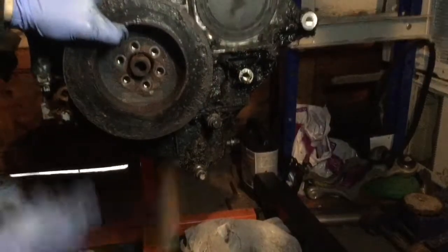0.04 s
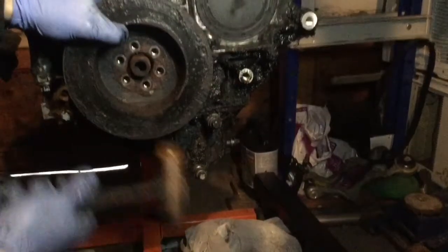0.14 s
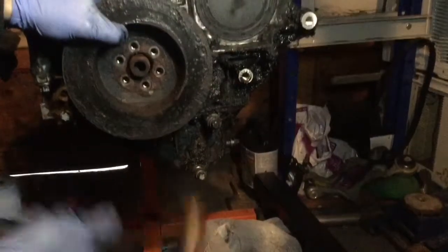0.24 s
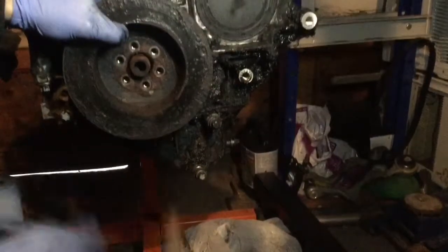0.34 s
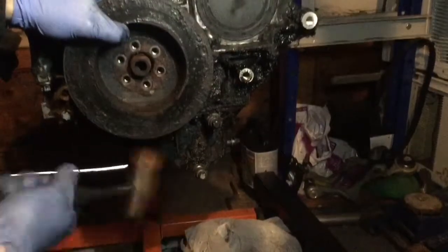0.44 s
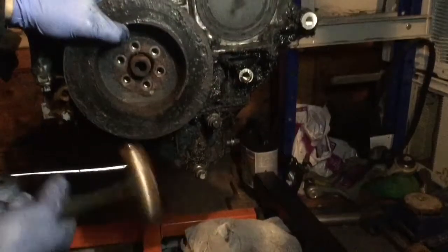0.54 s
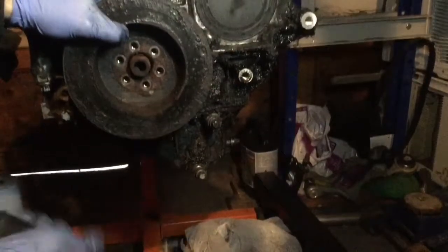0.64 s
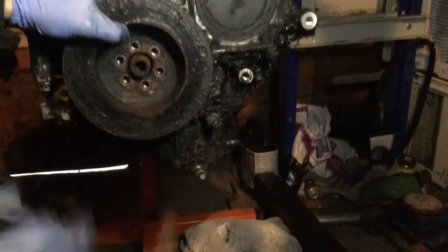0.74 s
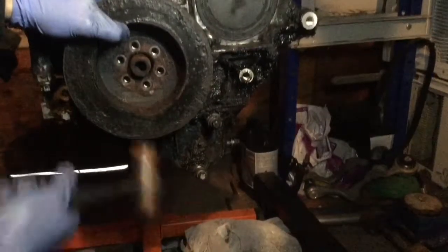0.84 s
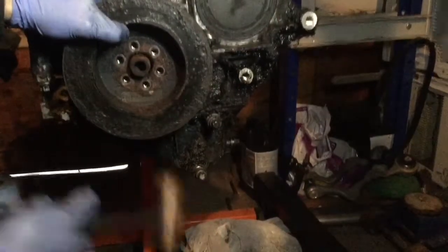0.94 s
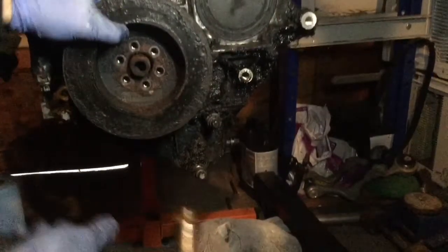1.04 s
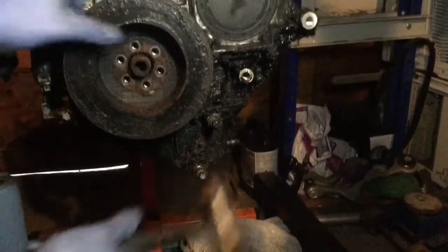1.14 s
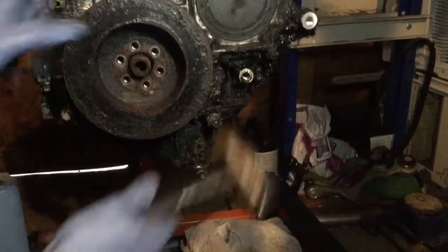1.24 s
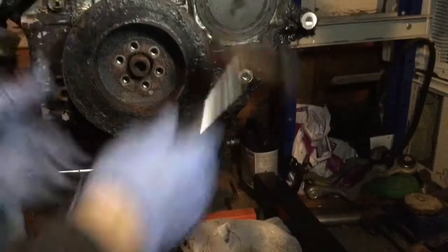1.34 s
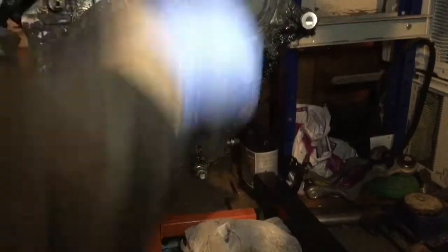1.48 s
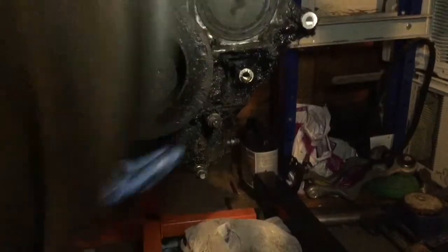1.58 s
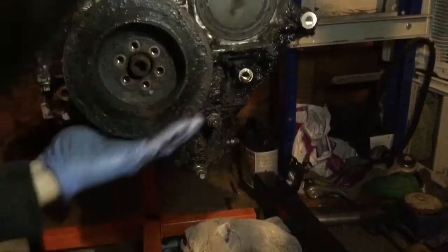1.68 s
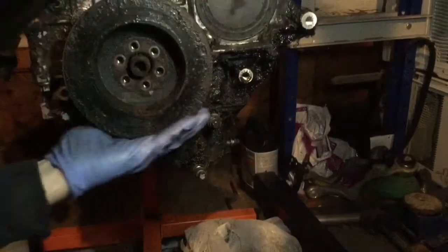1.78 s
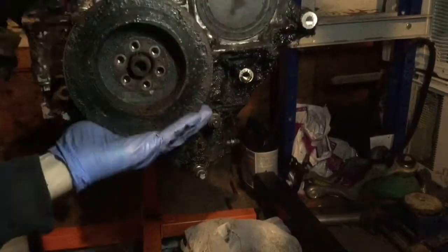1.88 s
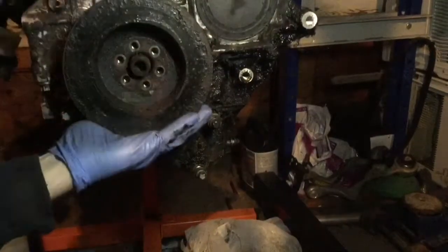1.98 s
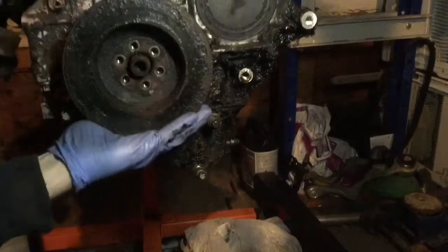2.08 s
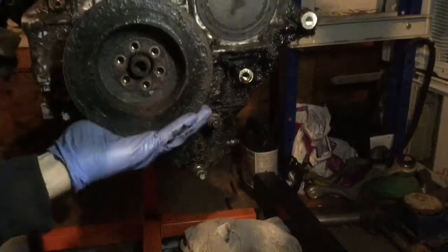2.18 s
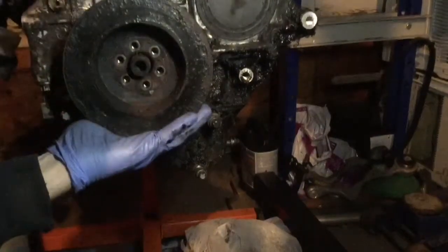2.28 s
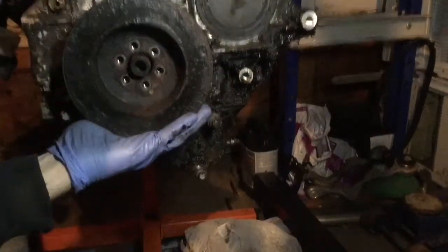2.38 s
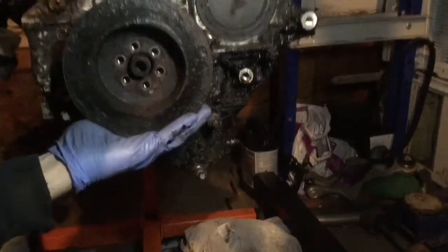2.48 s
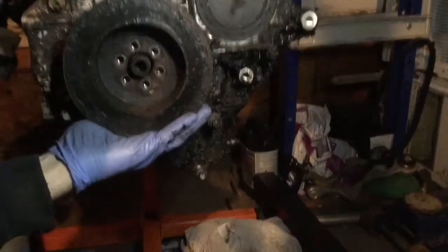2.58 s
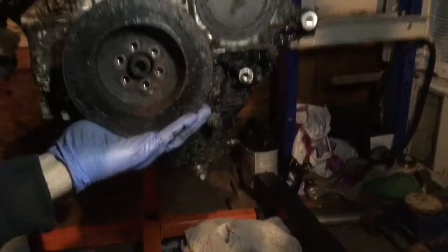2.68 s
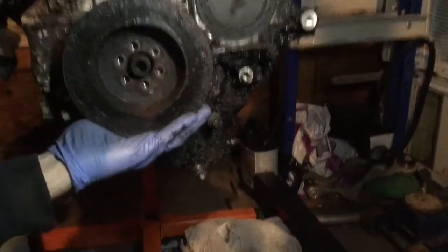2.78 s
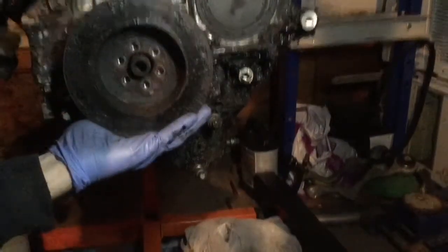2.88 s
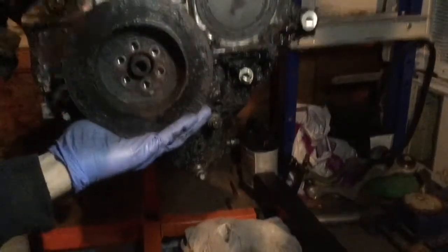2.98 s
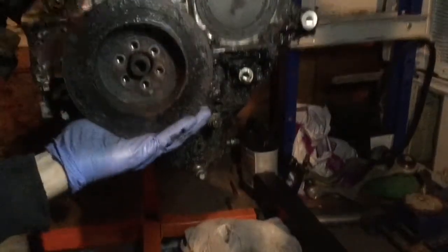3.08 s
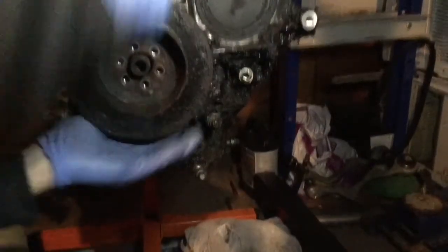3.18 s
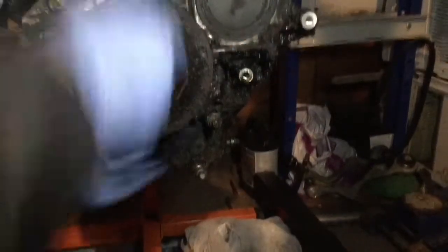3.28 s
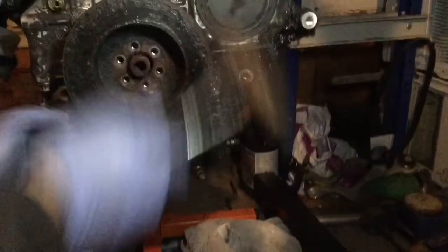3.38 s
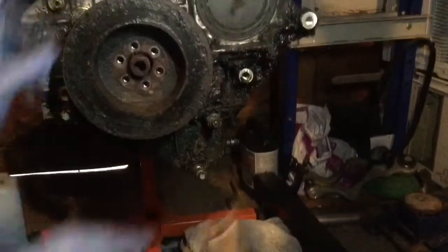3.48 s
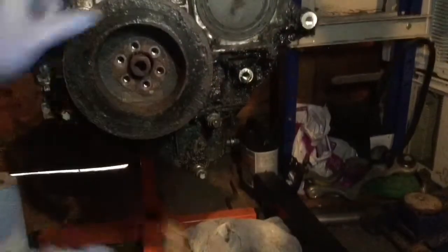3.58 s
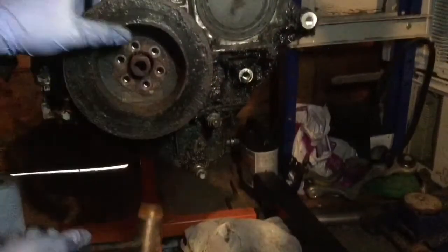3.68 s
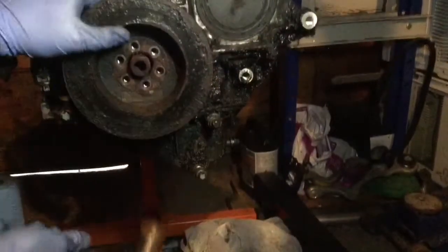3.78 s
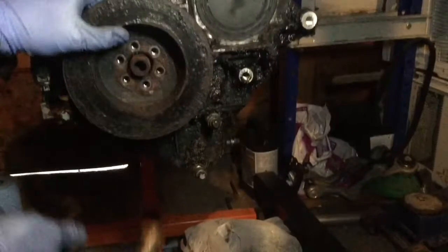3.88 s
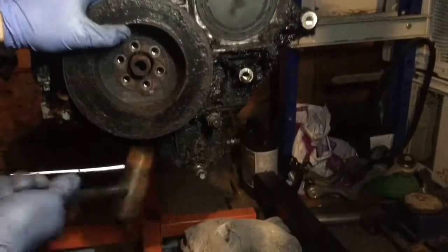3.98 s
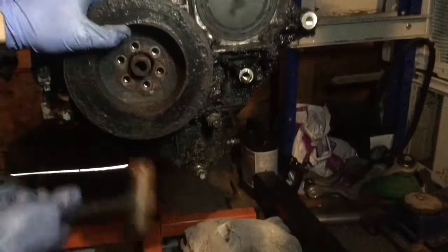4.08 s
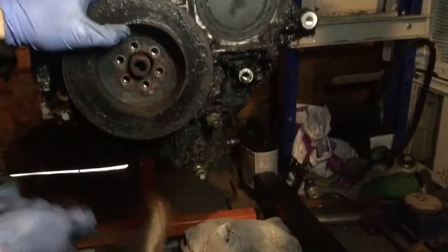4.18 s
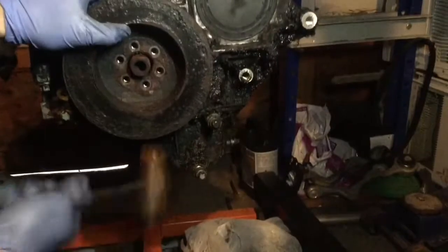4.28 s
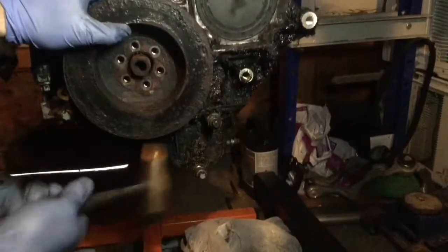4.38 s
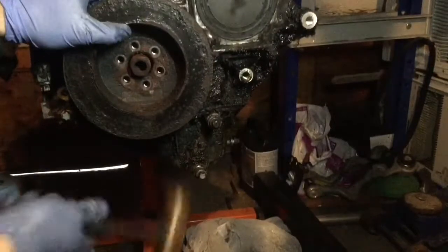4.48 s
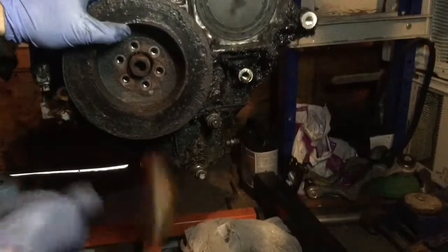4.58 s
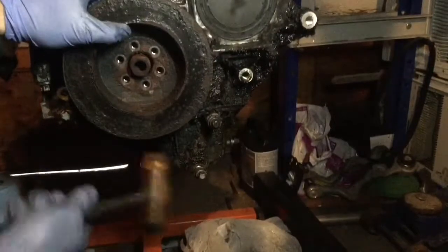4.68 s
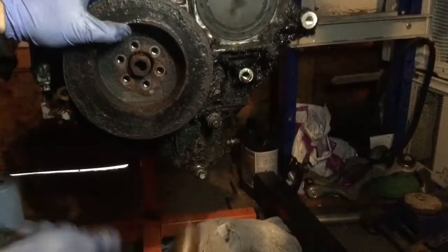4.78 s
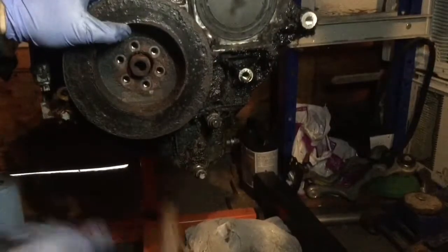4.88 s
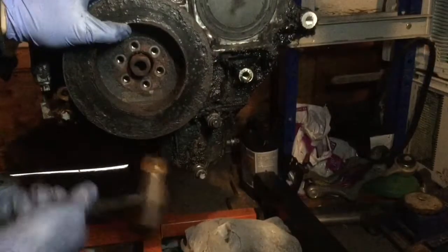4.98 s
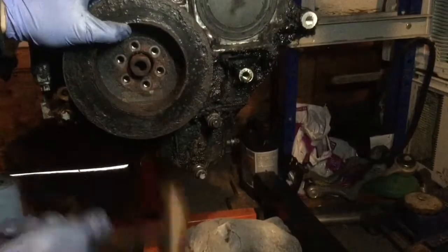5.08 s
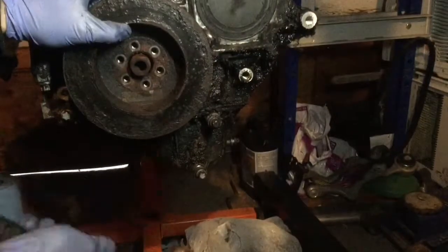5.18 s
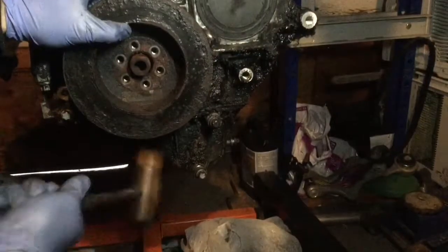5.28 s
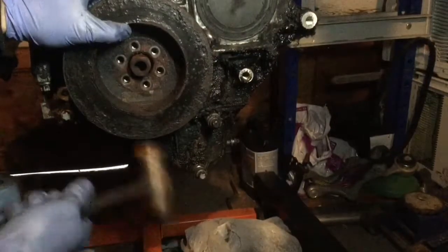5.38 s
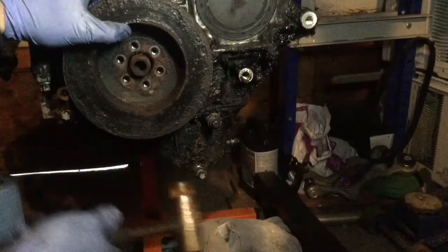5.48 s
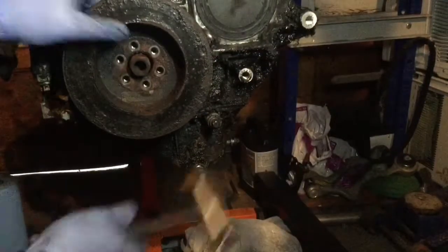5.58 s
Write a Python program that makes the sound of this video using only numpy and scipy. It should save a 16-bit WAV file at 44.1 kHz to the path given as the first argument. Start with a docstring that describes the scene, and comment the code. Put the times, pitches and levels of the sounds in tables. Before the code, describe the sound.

A mallet knocks a heavy steel engine pulley in three quick volleys, dull thuds with a short bright ring, cloth rustling between them.

```python
"""In a small workshop with a low rumble and a faint hum, a mallet strikes an engine's heavy steel pulley.
Three quick volleys follow one another. A gloved hand steadies and damps the pulley, so each blow is a thud,
a knock and a short bright ring: a noise crack, damped sines and decaying room noise.
Between the volleys the arm changes its grip: grainy cloth noise brushes past, the glove slides over
the steel, and small bumps wake the pulley's modes. One last short slide of the glove comes near the end."""
import sys
import numpy as np
from scipy import signal
from scipy.io import wavfile
from scipy.ndimage import uniform_filter1d

SR = 44100
rng = np.random.default_rng(int(sys.argv[2]) if len(sys.argv) > 2 else 0)


def master_out(mix):
    """Clip the mix to full scale and print it as 16-bit PCM to the path in sys.argv[1]."""
    frames = np.transpose(np.atleast_2d(mix))
    ceiling = np.clip(frames, -1, 1)
    pcm = np.round(ceiling * 32767).astype(np.int16)
    wavfile.write(sys.argv[1], SR, pcm)


N = 248724
TIME = np.arange(N) / SR
AGE = TIME[:int(0.75 * SR)]  # time since a blow (s)

# fine swish of sliding cloth and glove: pitch_hz, relative level (dB per Hz)
SWISH_SPECTRUM = [(1500, -21), (4000, -6.5), (6000, -8), (7500, -11), (12300, -3.5), (15000, -18),
                  (16000, -5)]


def from_db(db):
    """Decibels to gain."""
    return 10 ** (np.asarray(db) / 20)


def rms_one(x):
    """Scale to unit power."""
    return x / np.sqrt(np.mean(x ** 2) + 1e-20)


def at_hz(points, hz):
    """Read (pitch_hz, value) points on a log-frequency axis."""
    freqs, values = np.transpose(points)
    return np.interp(np.log(hz), np.log(freqs), values)


def add(track, start_s, sound):
    """Mix a sound into the track at a time."""
    start = round(start_s * SR)
    track[start:start + len(sound)] += sound[:N - start]


def noise_bands(size):
    """Narrow bands of noise, about a third of an octave wide, equal in power per Hz: (centre Hz, samples)."""
    edges_hz = np.geomspace(22, 17500, 30)
    run_in = SR // 5  # lets the filters settle
    white = rng.standard_normal((2, size + run_in))
    for k, (low, high) in enumerate(zip(edges_hz, edges_hz[1:])):
        bandpass = signal.butter(2, [low, high], "band", fs=SR, output="sos")
        # neighbouring bands draw on independent noises
        yield np.sqrt(low * high), signal.sosfilt(bandpass, white[k % 2])[run_in:]


def coloured(spectrum):
    """Steady noise with a given spectrum, rms 1."""
    return rms_one(sum(from_db(at_hz(spectrum, hz)) * band for hz, band in noise_bands(N)))


def dying(t60):
    """Exponential decay after a blow, 60 dB in t60 seconds."""
    return from_db(-60 * AGE / t60)


def swelling(rise_s):
    """Smooth build-up at the start of a sound."""
    return 1 - np.exp(-(AGE / rise_s) ** 2)


def ringing(modes, force, rise_s, scatter_db):
    """Damped sines, neighbours in opposite phase; low modes build up slower, and no two blows are quite alike."""
    out = np.zeros(len(AGE))
    for k, (hz, db, t60) in enumerate(modes):
        gain = from_db(db + at_hz(force, hz) + scatter_db * rng.standard_normal())
        sine = np.sin(2 * np.pi * hz * AGE + np.pi * k)
        out += gain * swelling(rise_s + 0.5 / hz) * dying(t60) * sine
    return out


def beating(cluster):
    """Nearly equal modes ring together and beat."""
    return sum(from_db(db) * dying(t60) * np.sin(2 * np.pi * hz * AGE) for hz, db, t60 in cluster)


def catching(depth_db, size):
    """A gain that wavers as a sliding surface catches and slips; size is the smoothing in samples."""
    waver = rms_one(uniform_filter1d(rng.standard_normal(N), size=size))
    return from_db(depth_db * waver)


def struck_at(spot):
    """The spot that is hit decides which modes answer: rows (pitch_hz, level_db, t60_s)."""
    # heavily damped modes of mallet, pulley and shaft: pitch_hz, t60_s,
    # then relative level_db when struck at the lower rim, the upper rim, the face
    damped_modes = [(213, 0.026, 6, 7, 7), (400, 0.022, 9, 12.5, 10.5), (551, 0.027, 9.5, 13, 8.5),
                    (787, 0.023, -10, 3.5, 6), (895.4, 0.017, 1, 11.5, 3), (1007, 0.023, 0.5, 2, 8),
                    (1213, 0.023, 8, 12.5, 13.5), (1398, 0.016, -0.5, 12, 9), (1580, 0.045, -6, -5, 2.5),
                    (1903, 0.025, -1, 2.5, 0), (2203, 0.1, -10.5, -2.5, -5.5), (2983, 0.026, 0.5, 0, -2.5),
                    (4727, 0.025, 6.5, 8, 3.5), (5023, 0.014, 6, 9.5, 5.5), (5420, 0.011, 7.5, 11, 15.5),
                    (5850, 0.01, 11.5, -3, 9), (6200, 0.01, 3, -1.5, 6)]
    return [(hz, levels_db[spot], t60) for hz, t60, *levels_db in damped_modes]


def background():
    """Workshop rumble as low coloured noise, with a faint electric hum of steady sines."""
    # workshop air: pitch_hz, relative level (dB per Hz)
    air_spectrum = [(20, -28), (35, -11), (55, 2), (100, -3), (160, -11), (300, -15), (500, -19),
                    (800, -21.5), (1800, -24), (2600, -28), (4000, -35), (7000, -40), (13000, -36),
                    (16000, -45)]
    # steady hum lines: pitch_hz, level_db (rms)
    hum_lines = [(100, -75), (449, -78), (1635, -87)]
    air_db = -61
    hum = np.zeros(N)
    for hz, db in hum_lines:
        hum += from_db(db) * np.sqrt(2) * np.sin(2 * np.pi * (hz * TIME + rng.random()))
    return from_db(air_db) * coloured(air_spectrum) + hum


def glove():
    """The glove slips over the steel with a thin, slightly uneven swish."""
    # slides: start_s, length_s, level_db
    slides = [(1.118, 0.09, -65), (1.708, 0.2, -63.5), (5.585, 0.066, -63.5)]
    edge_s = 0.014  # a slide starts and stops within this time
    level = np.zeros(N)
    for start_s, length_s, db in slides:
        nearest_end_s = np.minimum(TIME - start_s, start_s + length_s - TIME)
        level += from_db(db) * np.clip(nearest_end_s / edge_s, 0, 1)
    return level * coloured(SWISH_SPECTRUM) * catching(depth_db=2.0, size=1200)


def sleeve():
    """Cloth slides as the arm speeds up and slows: scuff, rub and swish, grainy from the catching weave."""
    # low scuff of cloth: pitch_hz, relative level (dB per Hz)
    scuff_spectrum = [(100, -9), (250, -1.5), (420, -3.5), (800, -9), (1200, -2), (2500, -37)]
    # dull rub of cloth: pitch_hz, relative level (dB per Hz)
    rub_spectrum = [(400, -18), (900, -2), (1350, -8), (2100, 1.5), (3000, -8.5), (4500, -12), (7000, -29),
                    (12000, -45)]
    # strokes of the sleeve: start_s, length_s, level_db of the rub at full speed, swish_db against the rub
    strokes = [(1.217, 0.31, -56.5, 0), (1.441, 0.21, -64, 1.5), (1.537, 0.3, -65.5, -7),
               (3.205, 0.29, -62, -7), (3.358, 0.19, -61.5, 1.5), (3.47, 0.4, -61, -2.5),
               (3.677, 0.25, -65, 1.6)]
    scuff_db = -3  # against the rub
    scuff_power, rub_power, swish_power = 1, 2.14, 2.14  # loudness as powers of the arm's speed
    out = np.zeros(N)
    grain = catching(depth_db=1.3, size=300)
    scuff, rub, swish = [coloured(spectrum) for spectrum in (scuff_spectrum, rub_spectrum, SWISH_SPECTRUM)]
    for start_s, length_s, db, swish_db in strokes:
        speed = np.sin(np.pi * np.clip((TIME - start_s) / length_s, 0, 1))
        out += from_db(db + scuff_db) * speed ** scuff_power * scuff
        out += from_db(db) * speed ** rub_power * rub
        out += from_db(db + swish_db) * speed ** swish_power * swish
    return out * grain


def hand():
    """Bumps and nudges wake the pulley's modes: a soft glove mostly the low ones, a harder nudge ticks."""
    # bumps: start_s, level_db of the push at 400 Hz, treble slope (dB per octave)
    bumps = [(1.398, -76, -4), (1.591, -55, -12), (2.141, -79.5, 3), (2.925, -75.5, 3), (3.243, -63, -3),
             (3.287, -51, -11.5), (3.396, -45, -6), (3.502, -67, -6)]
    out = np.zeros(N)
    modes = struck_at(0)  # as at the lower rim
    for start_s, db, slope in bumps:
        force = [(hz, db + slope * np.log2(hz / 400)) for hz, _, _ in modes]
        add(out, start_s, ringing(modes, force, rise_s=0.0019, scatter_db=1.5))
    return out


def workshop(bands, force, spot):
    """Dense reflections: the middle range returns alike for every blow on a spot, the rest differs."""
    # workshop reverberation: pitch_hz, relative level (dB per Hz)
    room_spectrum = [(30, -32), (80, -18), (140, -8.5), (300, -0.5), (550, 0.5), (800, -4), (1300, 0.5),
                     (2000, -4), (2700, -2.5), (3600, -10.5), (5200, -8), (7500, -17), (12500, -13),
                     (16000, -39)]
    # workshop decay: pitch_hz, t60_s
    room_decay = [(100, 0.41), (260, 0.26), (700, 0.22), (1840, 0.2), (4850, 0.15), (12800, .2)]
    same, fresh = spot * len(AGE), rng.integers(N - len(AGE))
    out = np.zeros(len(AGE))
    for hz, band in bands:
        start = same if 600 < hz < 2000 else fresh
        gain = from_db(at_hz(force, hz) + at_hz(room_spectrum, hz))
        out += gain * dying(at_hz(room_decay, hz)) * band[start:start + len(AGE)]
    return out * swelling(0.0024)


def contact(bands, force):
    """A burst of bright noise as the mallet face meets the steel."""
    # contact noise: pitch_hz, relative level (dB per Hz)
    crack_spectrum = [(1500, 4), (2500, 1), (3800, -3), (5200, 7), (7500, -3), (9500, 4), (12500, 6.5),
                      (16000, -6.5)]
    lowest_hz = crack_spectrum[0][0]
    start = rng.integers(N - len(AGE))
    hiss = np.zeros(len(AGE))
    for hz, band in bands:
        if hz > lowest_hz:
            gain = from_db(at_hz(force, hz) + at_hz(crack_spectrum, hz))
            hiss += gain * band[start:start + len(AGE)]
    return hiss * swelling(0.00096) * dying(0.0094)


def reflected(tone, echo_db, t60):
    """Dense wall echoes join a tone and make its decay lumpy."""
    echoes = rng.standard_normal(len(AGE)) * dying(t60) * swelling(0.026)
    echoes /= np.linalg.norm(echoes)
    return tone + from_db(echo_db) * signal.fftconvolve(tone, echoes)[:len(AGE)]


def rim(hold_s, drop_db, drop_s):
    """Close rim modes beat and decay; after hold_s a gain step lowers the ring by drop_db within drop_s."""
    # close modes of the pulley rim: pitch_hz, relative level_db, t60_s
    rim_modes = [(2629, 10, 0.21), (2642, 1.5, 0.08), (2612, 0, 0.27)]
    ring = reflected(beating(rim_modes) * swelling(0.0044), echo_db=-11, t60=0.26)
    gain_step = from_db(drop_db * np.clip((AGE - hold_s) / drop_s, 0, 1))
    return ring * gain_step


def shimmer():
    """The top overtones of the rim lie so close that they blur into a brief band of noise."""
    # a crowd of thin rim overtones: low_hz, high_hz, t60_s
    low, high, t60 = (8600, 9300, .15)
    bandpass = signal.butter(2, [low, high], "band", fs=SR, output="sos")
    band = rms_one(signal.sosfilt(bandpass, rng.standard_normal(len(AGE))))
    return band * swelling(0.00087) * dying(t60)


def blow_force(colour_db, strength_db, hardness_db, clink_db):
    """The spot's colour, raised by strength, tilted by hardness, with more or less clink: rows (Hz, dB)."""
    # where weight, thud, knock, clink and crack lie: pitch_hz
    blow_hz = [180, 500, 1100, 5200, 11000]
    knee_hz = 549  # hardness tilts everything above this pitch
    clink_hz, clink_octaves = 5200, 0.61  # middle and width of the clink
    hz = np.array(blow_hz)
    tilt = hardness_db * np.maximum(0, np.log2(hz / knee_hz))
    clink = clink_db * np.exp(-(np.log2(hz / clink_hz) / clink_octaves) ** 2)
    return list(zip(hz, np.array(colour_db) + strength_db + tilt + clink))


def mallet():
    """Each blow: a crack at the contact, damped modes, the ring of rim and block, and the room."""
    # blows, the fourth a rebound: start_s, spot (0 lower rim, 1 upper rim, 2 face), strength_db,
    # hardness (dB per octave), extra clink_db, rim ring_db, engine boom_db
    blows = [(0.1269, 0, -20.5, -1.2, 0.5, -37.5, -34.5), (0.4883, 0, -18.5, 2, -5, -26, -35),
             (0.86, 2, -19.5, -0.67, 5.5, -34.5, -37.5), (0.9207, 2, -31.5, -3, -7, -47, -41.5),
             (1.946, 1, -22, -0.3, -1, -34.5, -45), (2.2359, 1, -21, 0.94, -6, -29.5, -46),
             (2.504, 1, -21.5, 0, -1.5, -32.5, -46), (2.7692, 1, -22, -1, -0.5, -43.5, -60),
             (3.0392, 2, -18.5, -0.2, -7.5, -37, -46.5), (4.0319, 0, -22.5, 1.5, 0, -30, -46),
             (4.3582, 0, -22, -.4, 2.5, -39.5, -56.5), (4.6677, 0, -21.5, -1.2, 1, -48.5, -50),
             (4.9944, 0, -20.5, .3, 0.5, -44, -54.5), (5.3229, 0, -18, -0.66, 3, -44.5, -35.5)]
    # colour of a blow on the lower rim, the upper rim, the face:
    # tinkle_db, then relative weight_db, thud_db, knock_db, clink_db, crack_db
    spots = [(-27.5, -2, 0, -4.5, -12.5, -18.5), (-33, -3, 0, -0.34, -8, -10.5),
             (-34.5, -2, 0.002, -0.5, -9, -11)]
    # longer modes of the engine block and its stand: pitch_hz, relative level_db, t60_s
    block_modes = [(150, -21.5, 0.037), (191, -19.5, 0.15), (198.4, -11.5, 0.31), (266.5, -9, 0.22),
                   (300.4, -12.5, 0.23), (371, -5.5, 0.18), (459, -10, 0.23), (456, -11, 0.053),
                   (578, -13, 0.22), (616.2, -30, 0.22), (770, -20.5, 0.18), (993, -12.5, 0.23),
                   (1060, -18.5, 0.19), (1270, -31, 0.26), (1320, -16.5, 0.19), (1360, -40, .22),
                   (1510, -27.5, 0.23), (1760, -40, .25), (1660, -21, 0.12), (1912, -28, 0.22),
                   (2270, -17.5, 0.22)]
    # lightly damped steel parts that ring on faintly: pitch_hz, relative level_db, t60_s
    after_ring = [(642, -45, .8), (843, -45, .65), (945, -35, .4), (1275, -37, .45), (1595, -45, .7),
                  (1722, -46, .7), (1841, -44, .7), (2272, -42, .65)]
    # close modes of the whole engine that beat: pitch_hz, relative level_db, t60_s
    boom_modes = [(207.1, 7.1, 0.45), (200.66, 2.4, .48)]
    out = np.zeros(N)
    bands = list(noise_bands(N))
    for start_s, spot, strength_db, hardness_db, clink_db, rim_db, boom_db in blows:
        tinkle_db, *colour_db = spots[spot]
        force = blow_force(colour_db, strength_db, hardness_db, clink_db)
        crack = from_db(18.0) * contact(bands, force)
        knock = from_db(3.5) * ringing(struck_at(spot), force, rise_s=0.0013, scatter_db=1.94)
        block = from_db(2.5) * ringing(block_modes, force, rise_s=0.015, scatter_db=0.8)
        trail = ringing(after_ring, force, rise_s=0.012, scatter_db=4.5)
        rim_ring = from_db(rim_db) * rim(hold_s=0.076, drop_db=-8.5, drop_s=0.0093)
        tinkle = from_db(strength_db + tinkle_db) * shimmer()
        boom = from_db(boom_db) * beating(boom_modes) * swelling(0.04)
        room = from_db(10.0) * workshop(bands, force, spot)
        add(out, start_s, crack + knock + block + trail + rim_ring + tinkle + boom + room)
    return out


def scene():
    """Everything at one close microphone."""
    return (mallet() + sleeve() + glove() + hand() + background())[None]


def record(dry):
    """The hardest peaks are rounded by a soft limit and the top treble is cut steeply."""
    ceiling, cutoff_hz = 1.4, 16300
    rounded = ceiling * np.tanh(dry / ceiling)
    # the stopband, 70 dB down, begins a little above the cutoff
    lowpass = signal.cheby2(14, 70, cutoff_hz + 600, fs=SR, output="sos")
    return signal.sosfilt(lowpass, rounded)


dry = scene()
out = record(dry)
master_out(out)
```